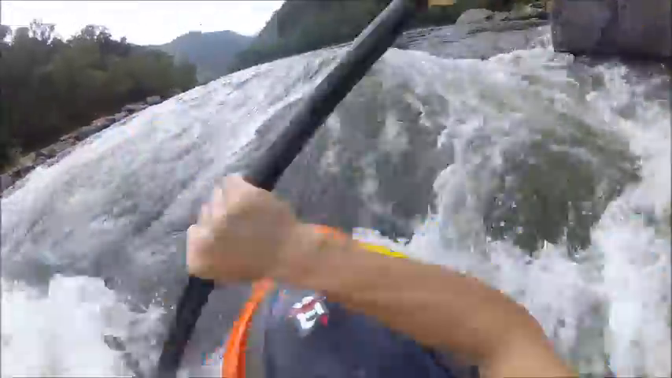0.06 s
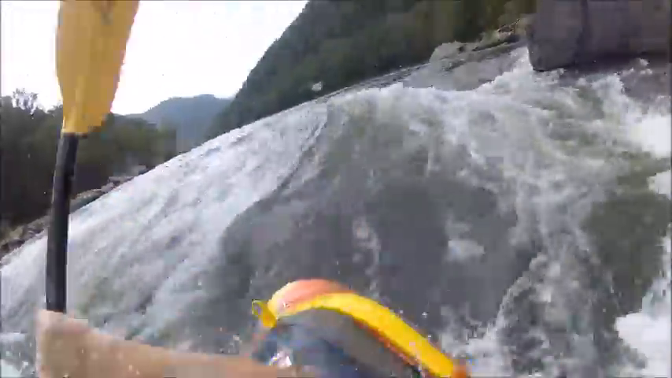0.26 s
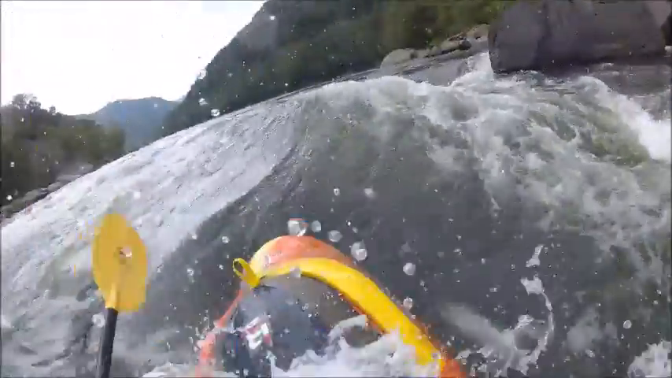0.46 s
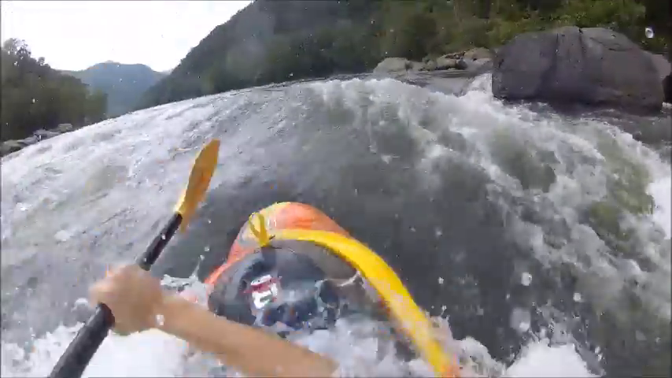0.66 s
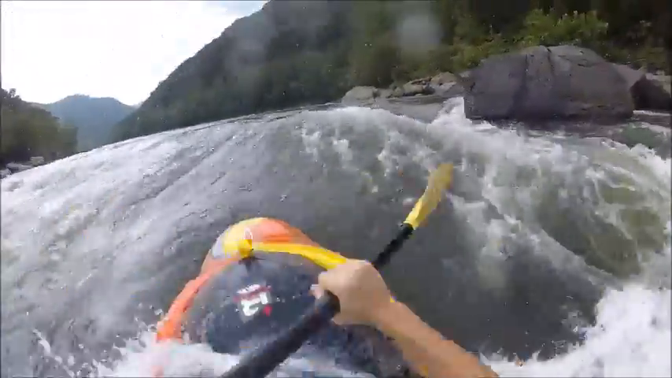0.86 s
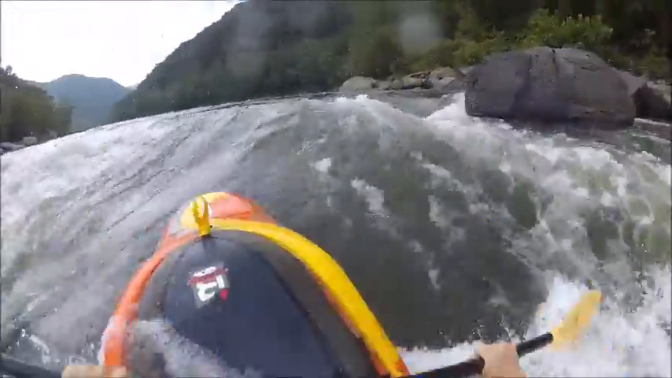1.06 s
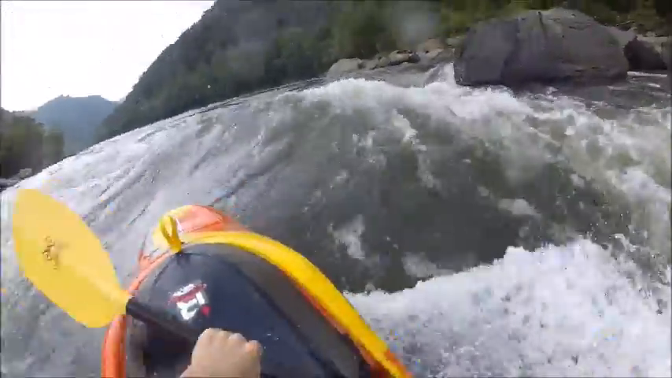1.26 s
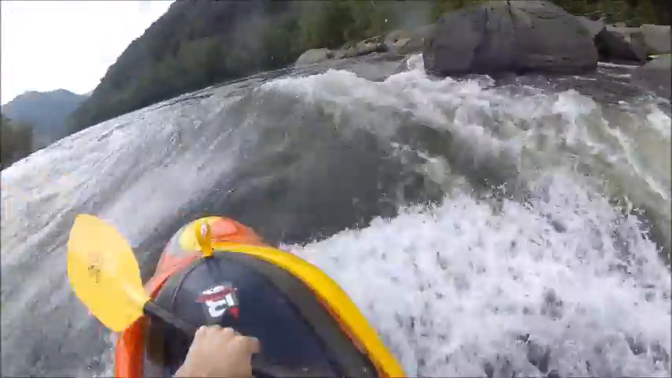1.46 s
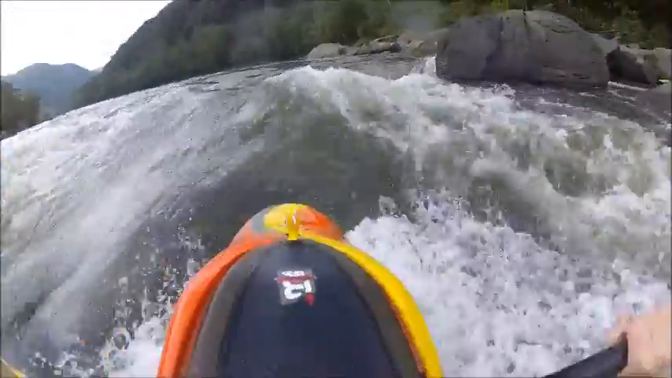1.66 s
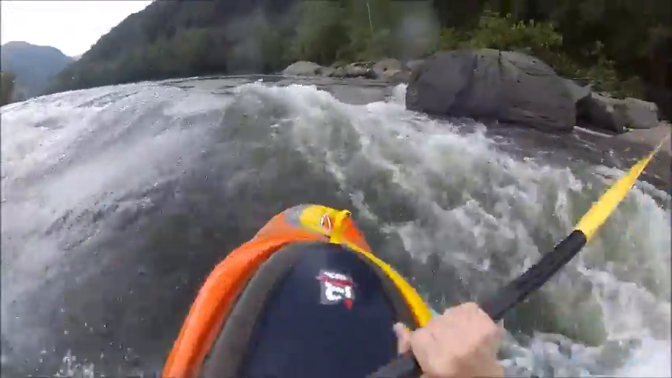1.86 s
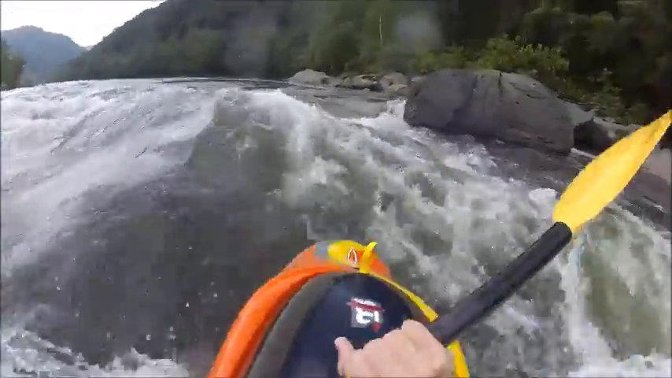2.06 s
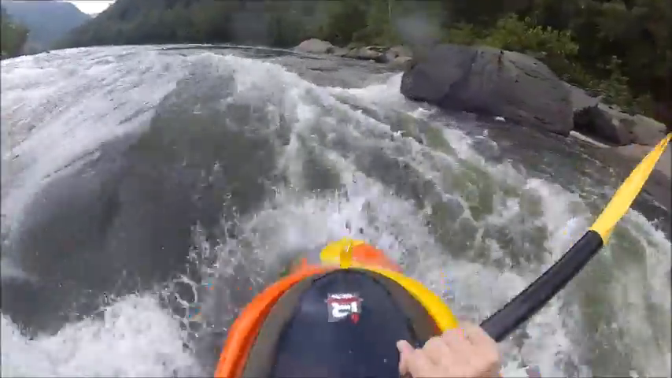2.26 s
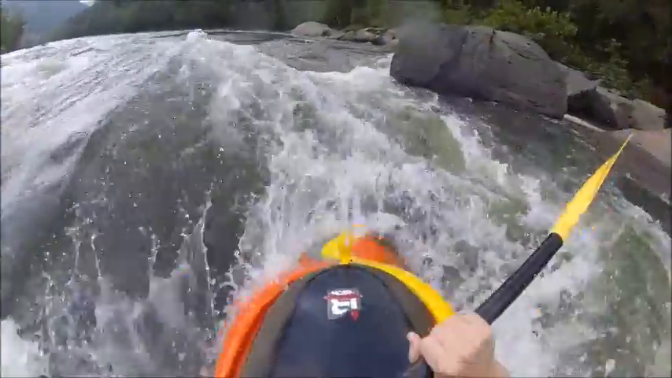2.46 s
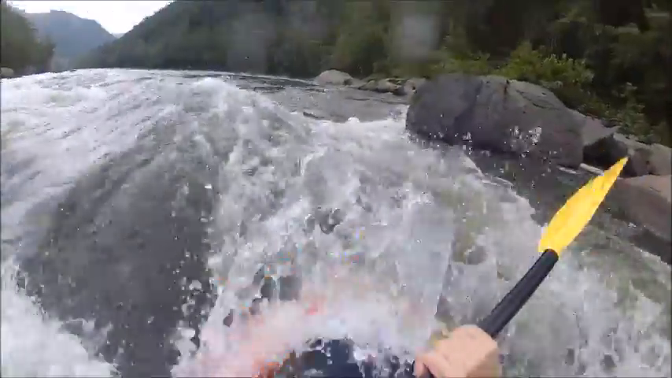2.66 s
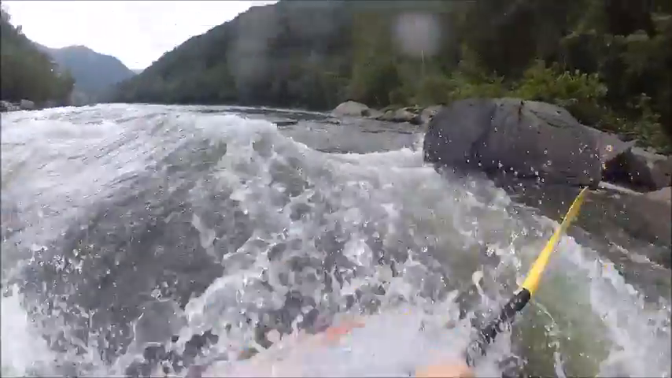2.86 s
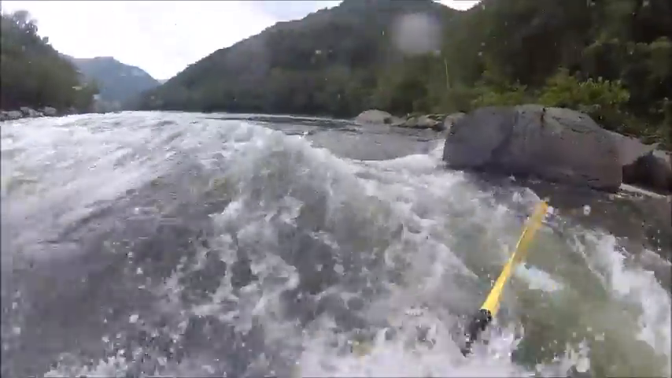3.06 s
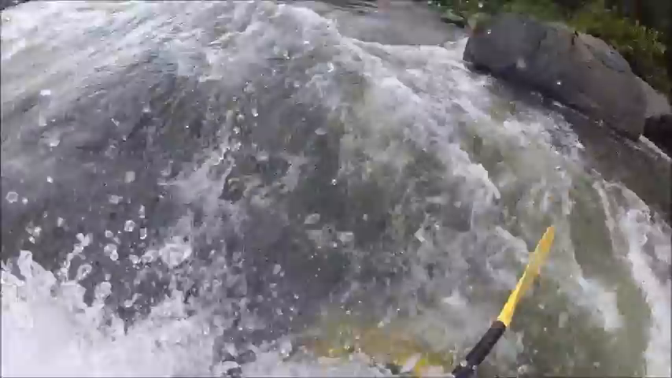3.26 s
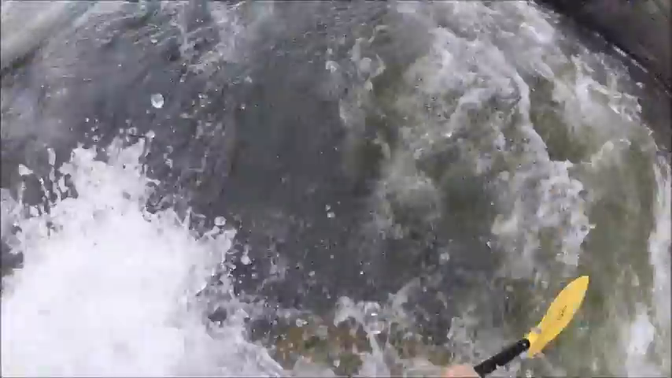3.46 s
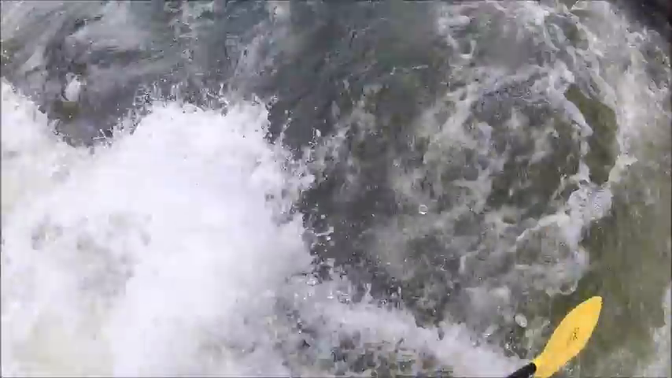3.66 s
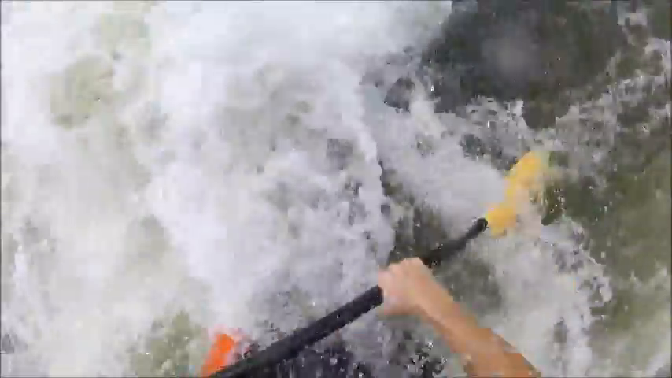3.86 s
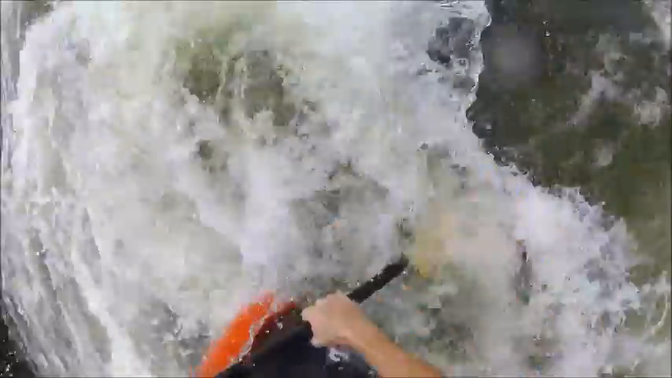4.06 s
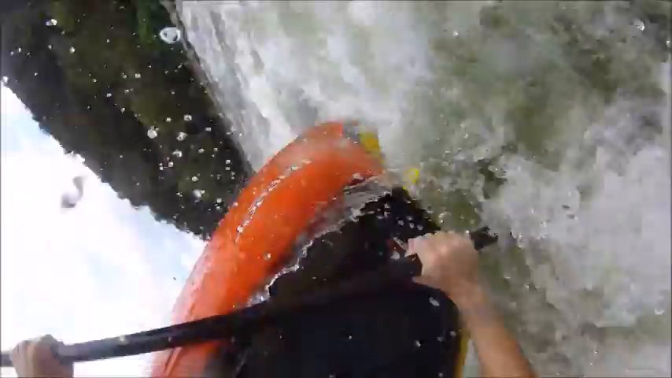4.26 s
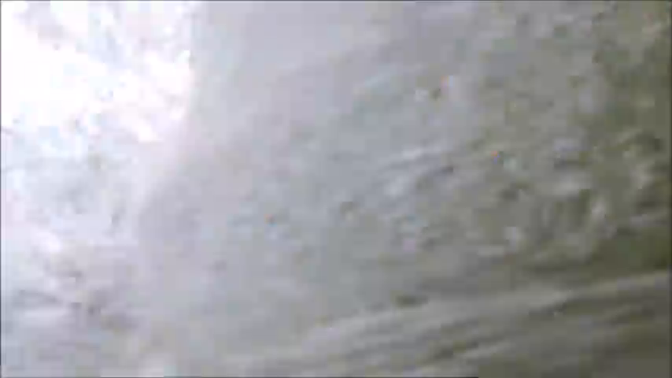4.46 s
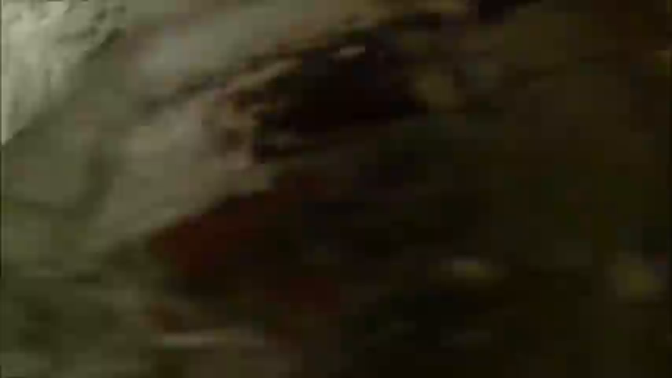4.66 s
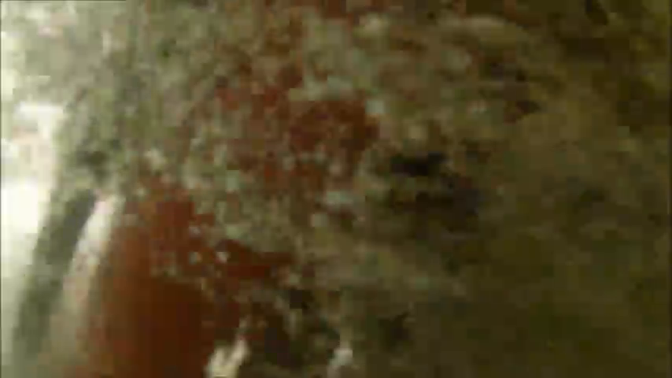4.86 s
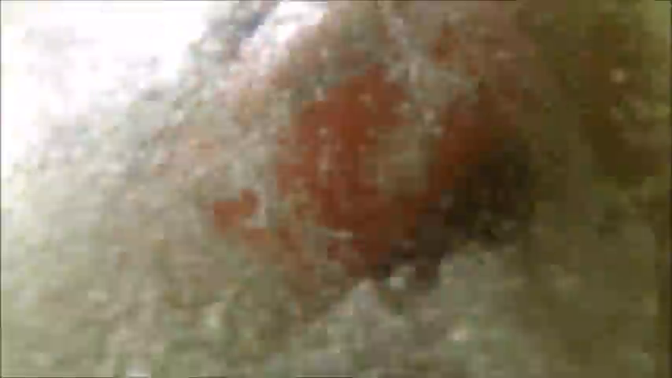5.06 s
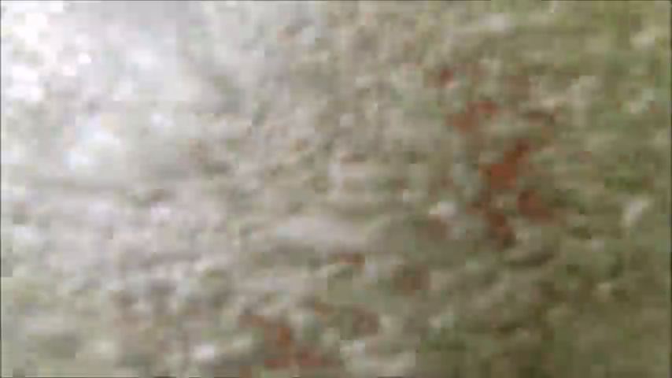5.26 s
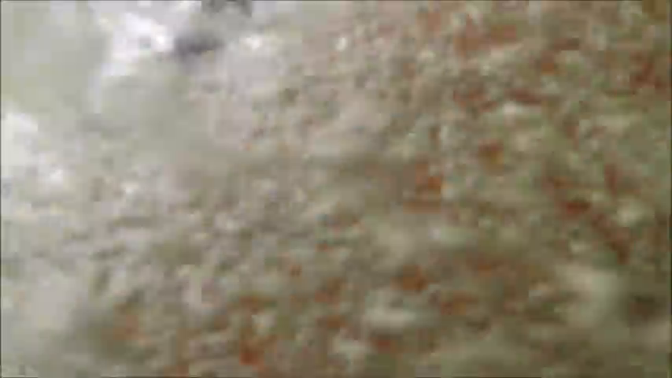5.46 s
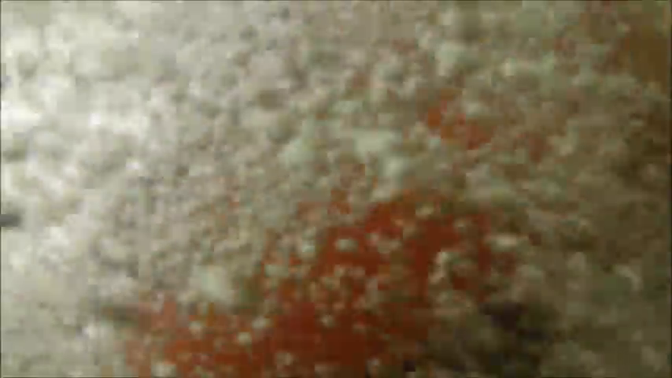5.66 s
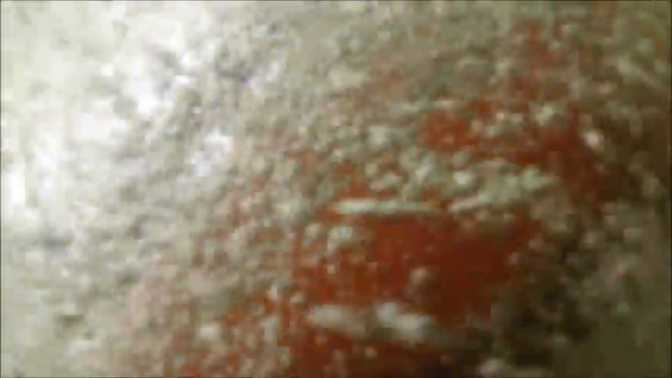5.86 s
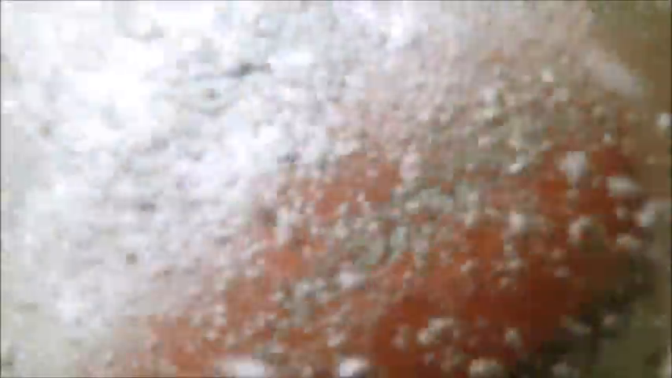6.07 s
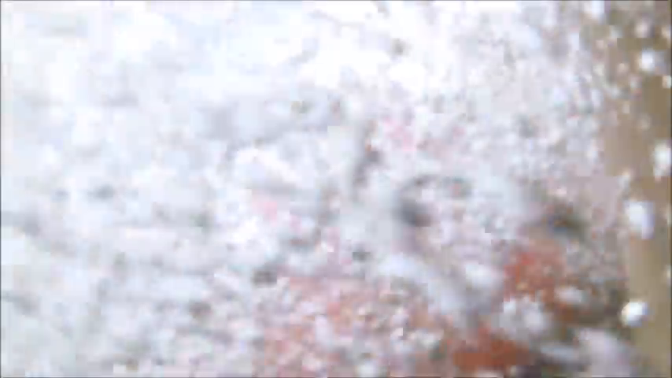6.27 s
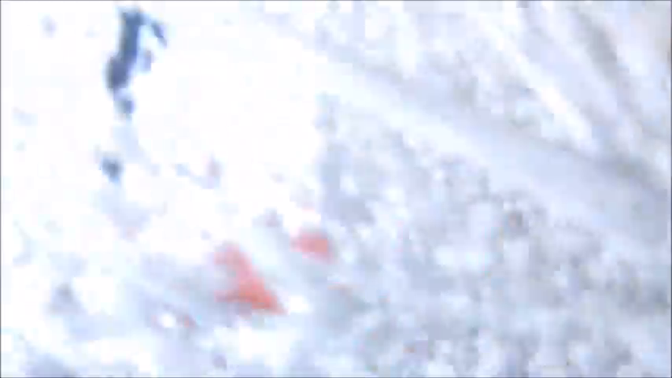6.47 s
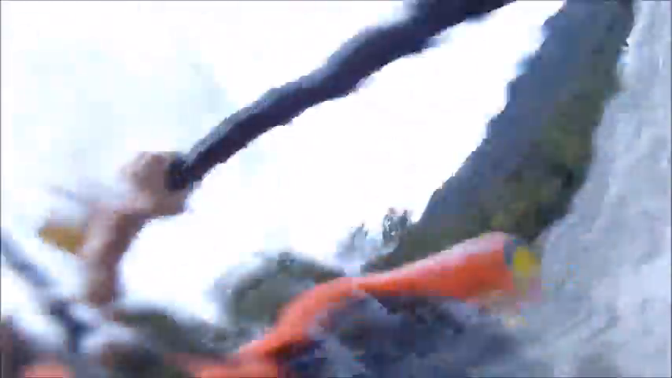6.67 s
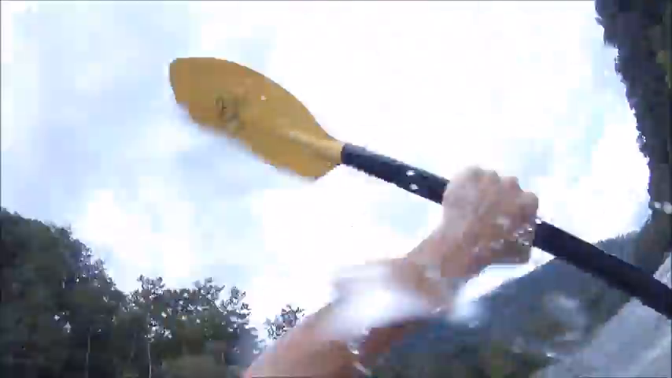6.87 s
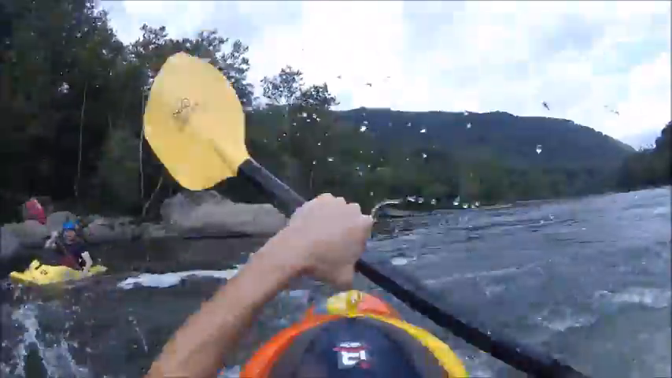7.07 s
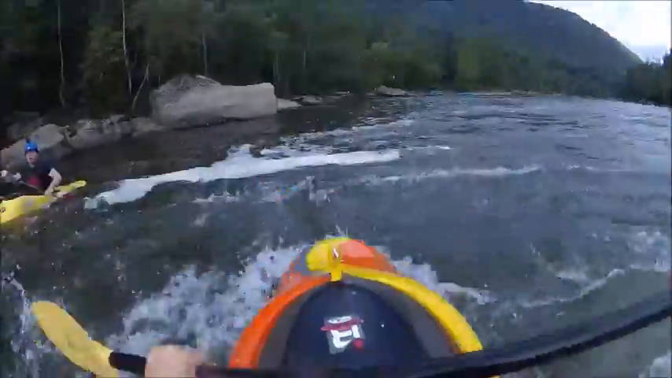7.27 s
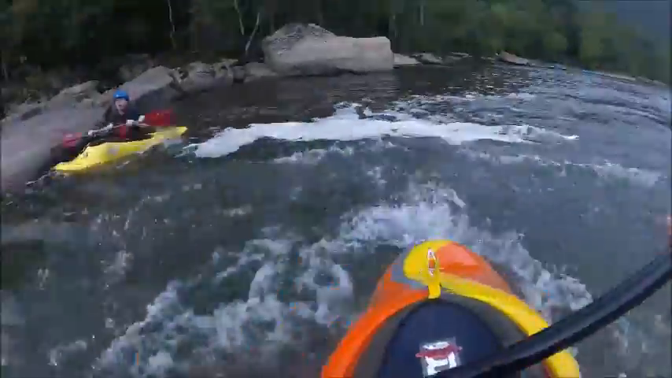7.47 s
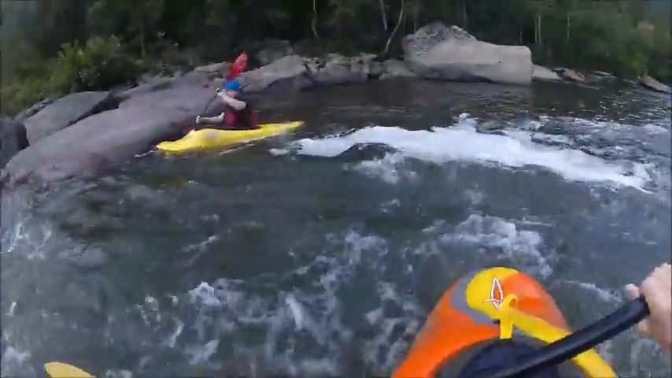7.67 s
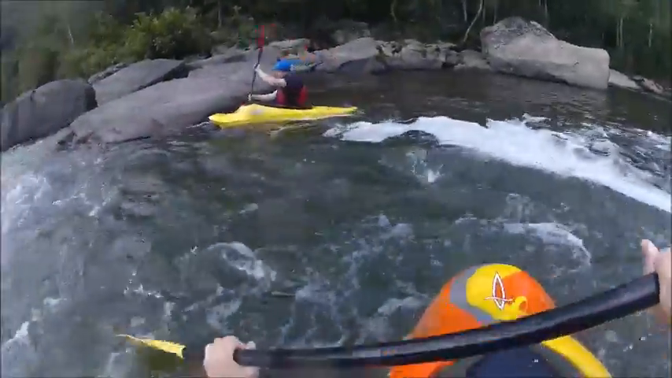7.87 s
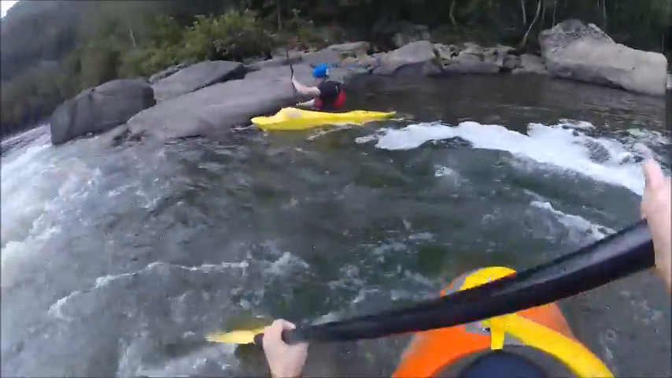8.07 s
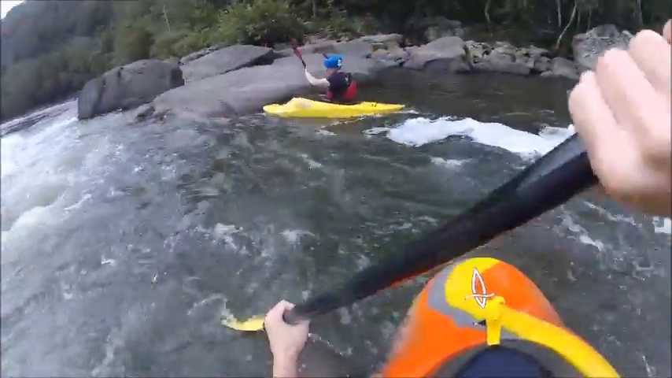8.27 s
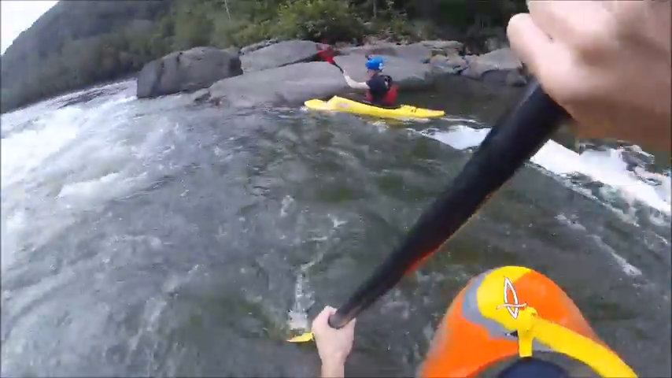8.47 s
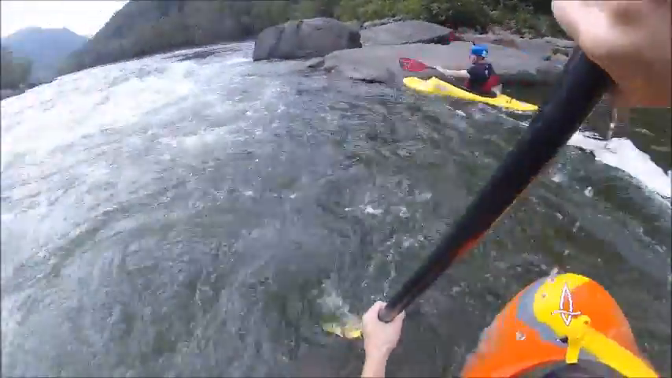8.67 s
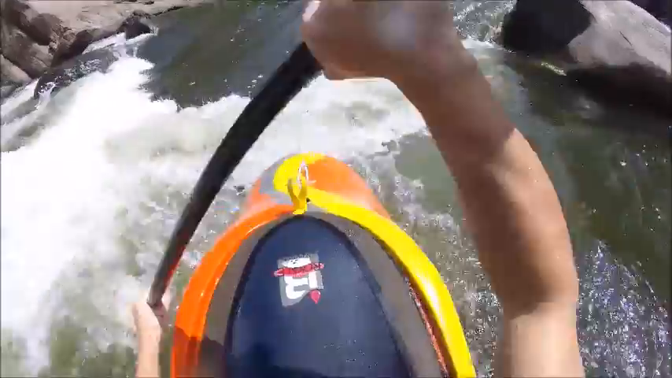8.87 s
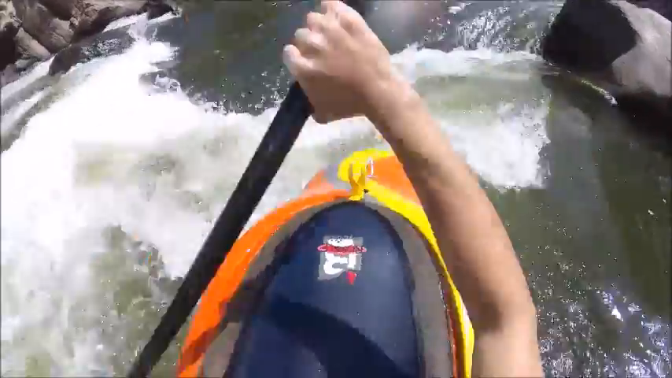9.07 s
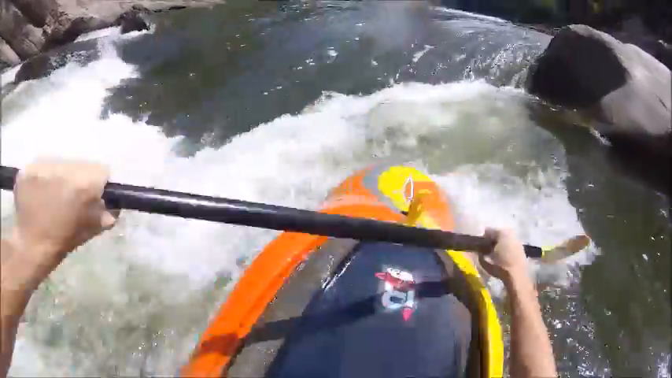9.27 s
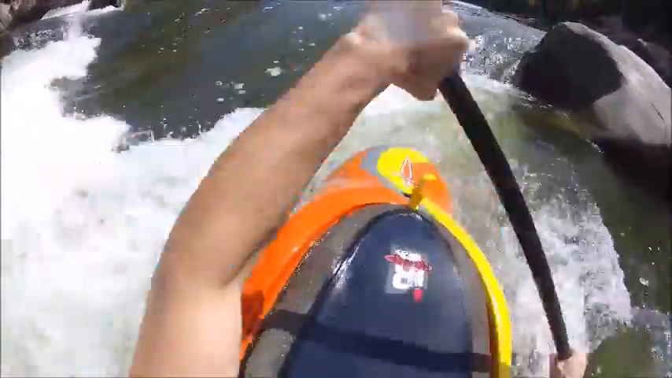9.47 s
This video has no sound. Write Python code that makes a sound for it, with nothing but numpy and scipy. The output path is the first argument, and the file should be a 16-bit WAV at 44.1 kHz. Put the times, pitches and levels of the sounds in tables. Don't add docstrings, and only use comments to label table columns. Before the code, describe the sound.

A kayak capsizes in a roaring rapid: foam hiss, sudden dunking, distorted stuttering clatter under water, near silence with clicking drips, then rushing water again.

```python
import sys
import numpy as np
from scipy import signal
from scipy.fft import rfft, irfft, next_fast_len
from scipy.io import wavfile
from scipy.ndimage import uniform_filter1d

SR = 44100
rng = np.random.default_rng(int(sys.argv[2]) if len(sys.argv) > 2 else 0)


def wav_out(sig):
    wavfile.write(sys.argv[1], SR, np.round(np.clip(np.atleast_2d(sig).T, -1, 1) * 32767).astype(np.int16))


def elevation(decibels):
    levels = np.asarray(decibels, float)
    return 10 ** (levels / 20)


N = 419391

# time [s], level [dB], brightness (share above 3 kHz) [dB].
ROAR = [(0.0, -21.5, -3.5), (0.18, -20.5, -4), (0.22, -21, -6.5), (1.51, -19.5, -4.5), (1.62, -21, -5),
        (2.03, -20, -6.5), (4.24, -20, -2), (4.36, -20, -3.5), (4.4, -16.5, -3.5)]
# time [s], level [dB], brightness [dB].
PLUNGE = [
    [(4.403, -18, -5.5), (4.408, -10, -6), (4.427, -16, -4.5)],
    [(4.429, -10, -2), (4.445, -11.5, -2)],
]
# time [s], level [dB], brightness [dB].
ROAR_RETURN = [
    [(7.352, -36.5, -9.5), (7.842, -35.5, -10), (8.289, -32.5, -9.5)],
    [(8.3, -34.5, -13.5), (8.676, -31, -10)],
    [(8.677, -38.5, -12), (8.822, -38.5, -11)],
    [(8.823, -23.5, -3.5), (9.405, -20, -4), (9.51, -21.5, -4)],
]
# frequency [Hz], density [dB per Hz].
FOAM_SPECTRUM = [(92, -34.5), (181, -18.5), (349, -9), (578, -2.5), (1090, 1), (2200, -2), (3500, -3.5),
                 (5200, -8), (5600, -11.5), (7000, -16.5), (8000, -28.5), (10200, -36.5), (10900, -41.5),
                 (12700, -42.5), (13500, -58.5)]
# start [s], end [s], treble change [dB].
PORT_WATER = [
    (4.428, 4.45, 11),
    (8.677, 8.822, -13),
]
# time [s], depth [dB].
TREBLE_DIPS = [(.17, -29), (.65, -20), (.72, -17), (1.345, -18), (2.113, -22), (2.156, -19), (2.65, -19),
               (3.25, -20), (3.74, -22), (9.41, -20)]
# time [s], rise [dB], length [s].
SURGES = [(0.17, 4, 0.012), (0.901, 5, 0.013), (1.35, 1, 0.047), (3.597, 3.5, 0.033), (3.972, 4, 0.047),
          (4.2, 4.5, 0.057), (2.696, 3.5, 0.057), (2.933, 3.5, 0.027)]
# start [s], length [ms], level [dB].
SLAMS_SINKING = [(4.4501, 22.7, -19), (4.4766, 5.6, -17), (4.4998, 8.6, -20), (4.52, 67.6, -16.5),
                 (4.586, 44.7, -11.5), (4.6349, 21, -19), (4.658, 11.7, -14), (4.677, 6.6, -18),
                 (4.7056, 3.1, -25.5), (4.7118, 8.1, -21), (4.7318, 28.7, -16.5), (4.769, 91.7, -13),
                 (4.8566, 59, -11.5), (4.9131, 31.7, -16), (4.9482, 39, -16.5), (4.9913, 2.6, -19),
                 (5.0079, 38.4, -18.5), (5.0492, 9, -18), (5.0669, 90, -14), (5.1661, 2.3, -22),
                 (5.1864, 68, -20), (5.2643, 86, -13.5), (5.3509, 3.6, -23), (5.371, 10.2, -27),
                 (5.3912, 30, -18.5), (5.4369, 23.4, -15.5), (5.4787, 12, -24), (5.5092, 1.8, -38),
                 (5.54, 5.2, -30.5)]
# start [s], length [ms], level [dB].
SLAMS_INVERTED = [(5.5624, 20.3, -16), (5.5885, 4.45, -22), (5.6, 35.8, -12), (5.6391, 3.04, -24.5),
                  (5.6619, 1.5, -35), (5.6898, 3, -29.5), (5.7157, 3, -31.5), (5.7499, 12.7, -20),
                  (5.7663, 24, -26.5), (5.7961, 14.7, -19), (5.816, 28, -12.5), (5.8479, 6.5, -21),
                  (5.8658, 18.7, -13.5), (5.8909, 45.7, -20.5), (5.9442, 40.6, -14.5), (6.003, 10.2, -20),
                  (6.022, 8.6, -26), (6.0445, 8, -14), (6.0608, 8.7, -23), (6.0803, 59, -18),
                  (6.1433, 9.4, -22), (6.159, 20.9, -14.5), (6.1859, 36.6, -24.5), (6.232, 4.1, -26),
                  (6.249, 24.3, -20.5), (6.2862, 17.4, -24.5), (6.3135, 11.4, -18), (6.3302, 3.9, -20.5),
                  (6.346, 9, -18.5), (6.3807, 5.5, -19.5)]
# start [s], length [ms], level [dB].
SLAMS_ROLLING = [(6.399, 14.6, -15), (6.4183, 20, -14), (6.442, 22, -16.5), (6.4678, 22, -14),
                 (6.4995, 12.7, -19.5), (6.5147, 2, -24), (6.5249, 45, -15), (6.5907, 9.9, -27),
                 (6.7938, .85, -40.5), (6.8358, 4.3, -22.5), (6.8853, 29.5, -12.5), (6.9158, 29, -15.5),
                 (6.949, 12, -21.5), (6.972, 8, -29), (6.9852, 7.2, -30.5), (7.0266, 2, -33),
                 (7.039, 7.4, -24.5), (7.051, 2, -37), (7.1356, 7, -17.5), (7.143, 5, -30)]
# start [s], length [ms], level [dB].
FLICKS = [(4.492, 2.4, -30), (4.6904, 5.5, -29), (4.7624, 3, -27), (5.1737, 1.4, -36), (5.3653, 1.2, -33),
          (5.425, 1.3, -26), (5.5242, .5, -42.5), (5.5526, 1.2, -44), (5.6795, 0.83, -44),
          (5.9997, 0.97, -34), (6.0384, 1, -29.5), (6.0725, 2.1, -35), (6.338, 0.98, -35),
          (6.3592, 1.1, -34), (6.3738, 2.05, -30), (6.494, 1.9, -34.5), (7.022, 2.6, -43)]
# time [s], swing rate [Hz], share of sound above 5 kHz [dB].
STRAIN = [(4.47, 480, -11.5), (4.62, 517, -11.5), (4.87, 549.6, -6.5), (5.03, 339.8, -14.5),
          (5.22, 295, -14), (5.45, 359, -14.5), (5.61, 418, -11.5), (5.76, 307.8, -16.5),
          (6.02, 319.3, -15), (6.045, 750, -8), (6.07, 353, -16.5), (6.24, 327, -18), (6.43, 397, -12),
          (6.8, 450, -22), (6.835, 330, -10), (6.9, 358, -17.5), (7.04, 520, -23), (7.13, 1050, -17.5)]
# start [s], level [dB].
PINNED = [(4.447, -42), (5.25, -95), (5.27, -48.5), (5.422, -86), (5.44, -32), (5.48, -58), (5.63, -93),
          (5.717, -50.5), (5.87, -38), (5.93, -46), (6.25, -42.5), (6.33, -57),
          (6.388, -97.5)  , (6.4, -38), (6.56, -63), (6.601, -76), (6.795, -66.5), (6.841, -52)]
# frequency [Hz], density [dB per Hz].
SEEP_SPECTRUM = [(60, -18.5), (217, -11), (417, -22), (750, -8), (1200, -11), (2500, -12), (5000, -21),
                 (9000, -47), (16000, -50)]
# frequency [Hz], density [dB per Hz].
POCKET_SPECTRUM = [(60, -25), (250, -16.5), (480, -6), (750, -4.5), (1000, -11), (1500, -20.5), (2700, -25),
                   (5000, -39.5), (7000, -52), (16000, -71)]
# start [s], length [ms], level [dB].
CLOGS = [(7.056, 12, -48), (7.104, 20, -71), (7.12, 17, -43), (7.211, 51, -74), (7.329, 21, -62),
         (8.289, 11, -52)]
# time [s], peak [dB], pitch [Hz], t60 [s], thump [dB].
DRIPS = [(7.351, -21, 910, 0.0021, -26), (7.8785, -16, 1900, 0.0047, -48), (7.8803, -19, 2400, .004, -50),
         (7.8893, -11, 2300, 0.0066, -40), (7.8968, -8, 1700, 0.0016, -39), (8.278, -34, 2500, 0.0025, -45),
         (8.287, -23, 2800, 0.0061, -23), (8.3325, -15, 2420, 0.003, -46), (8.3362, -13, 800, 0.0063, -43),
         (8.3362, -11, 2000, .002, -50), (8.3362, -17, 3400, 0.0021, -50), (8.347, -20, 980, 0.0041, -48),
         (8.4445, -16, 2920, .005, -45), (8.4447, -15, 1900, 0.0032, -50), (8.6547, -9, 2230, 0.0034, -44),
         (8.671, -4.5, 1660, 0.004, -45)]

SPELLS = [*SLAMS_SINKING, *SLAMS_INVERTED, *SLAMS_ROLLING, *FLICKS]

# inner edges, level at CLEAR_DB brightness, dB gained per dB of brightness
ZONES_HZ = (1200, 3000, 7500)
ZONE_DB, CLEAR_DB = (-5, -1, -2, -16.5), -5.5
ZONE_LEAN = (-0.61, -0.38, 1, 0.58)
LOW_CUT_HZ, VENT_HZ = 264, 800
PORT_HZ, PORT_WIDTH_HZ, CROSSING_S = 2950, 870, 0.00032
BURST_MS, WEAK_BURST_MS, WEAK_DB = 30, 9, -21.8
STALL_MS, FLICK_HZ_MS = 2.5, 450
SWELL_DB, SWELL_SHARE = -6, 0.15
RATE_SCATTER_DB, EDGE_SCATTER_DB, BURST_SCATTER_DB = 1.7, 2, 1.1
FREE_SEEP_DB, SURFACE_S = -34.5, 6.94
DRAIN_START_S, DRAIN_STOP_S, DRAIN_FADE_S = 6.9515, 7.351, 0.07
DRAIN_DB, DRAIN_END_DB = -15.5, -36.5
GLUG_HZ, GLUG_DB = 75, 5
TOP_HZ = 15750


def level(x, db):
    return x * elevation(db) / np.sqrt(np.mean(x ** 2) + 1e-18)


def walk(rate_hz):
    hold = int(SR / rate_hz)
    steps = np.repeat(rng.standard_normal(N // hold + 1), hold)
    return 1.07 * uniform_filter1d(uniform_filter1d(steps, hold), hold)[:N]


def colour(x, shape, lo_hz=0., hi_hz=SR):
    size = next_fast_len(N)
    hz = np.arange(size // 2 + 1) * SR / size + 0.0011
    shape_hz, shape_db = np.transpose(shape)
    gain = elevation(np.interp(np.log(hz), np.log(shape_hz), shape_db))
    band = (hz >= lo_hz) * (hz < hi_hz)
    return irfft(rfft(x, size) * gain * band, size)[:N]


def cut(x, hz, kind, order=2):
    return signal.sosfilt(signal.butter(order, hz, kind, fs=SR, output="sos"), x)


def roar_curves_db():
    t = np.arange(N) / SR
    curves = np.full((4, N), -120.)
    for rows in [ROAR + PLUNGE[0], PLUNGE[1], *ROAR_RETURN]:
        s, roar_db, bright_db = np.transpose(rows)
        span = (t >= s[0]) & (t <= s[-1] + 0.001)
        for zone, (db, lean) in enumerate(zip(ZONE_DB, ZONE_LEAN)):
            curves[zone, span] = np.interp(t[span], s, roar_db + db + lean * (bright_db - CLEAR_DB))
    for start, end, db in PORT_WATER:
        curves[3] += db * ((t > start) & (t < end))
    for s, db in TREBLE_DIPS:
        curves[3] += db * np.exp(-((t - s) / 0.0065) ** 2)
    zone_share = np.array([[0.4], [0.8], [1], [1]])
    for s, db, length in SURGES:
        curves += zone_share * db * np.exp(-((t - s) / length) ** 2)
    return curves


def foam():
    curves = roar_curves_db()
    out = level(rng.standard_normal(N), -55.5) * (curves[0] > -100)
    pops = (rng.random(N) < 3000 / SR) * rng.standard_normal(N) * elevation(1.6 * rng.exponential(size=N))
    wash = rng.standard_normal(N) + level(pops, -5.5)
    edges = (50, *ZONES_HZ, SR / 2)
    zones = []
    for steps in np.geomspace(edges[:-1], edges[1:], 5).T:
        zones.append([colour(wash, FOAM_SPECTRUM, a, b) for a, b in zip(steps, steps[1:])])
    zone_rms = np.array([[np.std(sum(zone))] for zone in zones])
    gains = uniform_filter1d(elevation(curves + 0.57 * walk(6)), size=24) / zone_rms
    for k, band in enumerate(sum(zones, [])):
        place = np.clip((k - 1.5) / 4, 0, 2.999)
        near, share = int(place), place % 1
        gain = gains[near] ** (1 - share) * gains[near + 1] ** share
        out = out + band * elevation(0.95 * walk(18)) * gain
    return out


def slam(ms, hz, db, edge_db, chance):
    size = int(ms * SR / 1000)
    halves = 2 * max(round(ms * hz / 1000), 1)
    ends = np.cumsum(elevation(900 / hz * chance[:halves]))
    ends = (ends - 0.5 * ends[0]) * size / (ends[-1] - 0.5 * ends[0])
    which = np.searchsorted(ends, np.arange(size)).clip(0, halves - 1)

    sluggish = elevation(0.23 * max(-6 - edge_db, 0))
    crossing = CROSSING_S * SR * sluggish * elevation(2.0 * chance[halves:2 * halves])
    crossing = np.minimum(crossing, 0.8 * np.diff(np.r_[-size, ends]))
    progress = 1.5 - (ends[which] - np.arange(size)) / crossing[which]
    rattle = 0.16 * elevation(edge_db + 4.5) * np.resize(chance, size) * (progress > 0)
    recoil = -0.4 * progress.clip(0)
    speed = np.where(progress > 0.5, progress - 0.5, recoil) + rattle

    reach = elevation(15.5 * chance[::-1][which]).clip(0, 1.3)
    age = np.arange(size) / size
    reach *= elevation(-5.0 * age + SWELL_DB * (1 - age / SWELL_SHARE).clip(0))
    swings = np.r_[(-1.) ** which * reach * speed, np.zeros(400)]
    stiff = cut(swings, VENT_HZ, "high", order=1)
    spikes = cut(stiff, LOW_CUT_HZ, "high", order=1)
    ring = signal.lfilter(*signal.iirpeak(PORT_HZ, PORT_HZ / PORT_WIDTH_HZ, fs=SR), spikes)

    cushion_hz = np.clip(15000 * elevation(1.03 * (edge_db + 4.5)), 900, 19000)
    soft = cut(spikes + 0.19 * ring, cushion_hz, "low")
    glint = np.r_[elevation(edge_db + 4 + 5.0 * chance[which + 90]).clip(0, 1), np.zeros(400)]
    edge = cut(cut(spikes, cushion_hz, "high", order=1), 9800.0, "low", order=1)
    hard = uniform_filter1d(glint, size=24, origin=11) * edge
    return level(soft + hard, db) * np.sqrt(len(spikes) / size)


def slamming():
    out = np.zeros(N)
    when, swing_hz, edge_db = np.transpose(STRAIN)
    for (s, ms, db), rows in zip(SPELLS, rng.standard_normal((len(SPELLS), 6, 200))):
        burst_ms = BURST_MS if db > WEAK_DB else WEAK_BURST_MS
        count = min(int(np.ceil(ms / burst_ms)), 6)
        for k, row in enumerate(rows[:count]):
            start_s = s + k * ms / count / 1000
            length_ms = ms / count - STALL_MS * (k < count - 1)
            hz = np.interp(start_s, when, swing_hz) * elevation(RATE_SCATTER_DB * row[80])
            hz += FLICK_HZ_MS / length_ms
            burst_db = db + BURST_SCATTER_DB * row[81] * (count > 1)
            burst_edge_db = np.interp(start_s, when, edge_db) + EDGE_SCATTER_DB * row[82]
            burst = slam(length_ms, hz, burst_db, burst_edge_db, row)
            at = int(start_s * SR)
            out[at:at + len(burst)] += burst
    return out


def seep_db(t):
    free = np.zeros(N, bool)
    for s, ms, _ in SPELLS:
        free[int(s * SR):int((s + ms / 1000) * SR)] = True
    marks = np.array([(0, -120), *PINNED])
    pinned_db = marks[np.searchsorted(marks[:, 0], t, "right") - 1, 1]
    db = np.where(free, FREE_SEEP_DB, pinned_db)
    since = t - DRAIN_START_S
    full = np.exp(-since.clip(0) / DRAIN_FADE_S)
    glug_db = GLUG_DB * np.cos(2 * np.pi * GLUG_HZ * since)
    draining = DRAIN_END_DB + (DRAIN_DB - DRAIN_END_DB + glug_db) * full
    db = np.where(t < DRAIN_START_S, db, np.where(t < DRAIN_STOP_S, draining, -120))
    for s, ms, clog_db in CLOGS:
        db[(t >= s) & (t < s + ms / 1000)] = clog_db
    return db


def gurgle():
    t = np.arange(N) / SR
    below = level(colour(rng.standard_normal(N), SEEP_SPECTRUM), 0) * elevation(5.6 * walk(120))
    above = level(colour(rng.standard_normal(N), POCKET_SPECTRUM), 0) * elevation(1.3 * walk(54))
    return np.where(t < SURFACE_S, below, above) * elevation(uniform_filter1d(seep_db(t), size=90))


def drips():
    out, t = np.zeros(N), np.arange(2000) / SR
    for s, db, hz, t60, thump_db in DRIPS:
        decay = np.exp(-np.log(1000) * t / t60)
        ring = np.sin(2 * np.pi * hz * t) * decay * (1 - np.exp(-t / 0.00062))
        thump = np.sin(2 * np.pi * 160 * t) * np.exp(-t / 0.0027)
        at = int(s * SR)
        out[at:at + len(t)] += elevation(db) * ring / ring.max() + elevation(thump_db) * thump
    return out


def preamp_hiss():
    return level(colour(rng.standard_normal(N), SEEP_SPECTRUM), -79)


def scene():
    return (foam() + slamming() + gurgle() + drips() + preamp_hiss())[None]


def band_limit(x):
    return signal.sosfilt(signal.butter(12, 16850, fs=SR, output="sos"), x)


def record(dry):
    rounded = np.tanh(0.82 * dry) / 1.117
    rumble_free = cut(rounded, 77.0, "high")
    top = signal.ellip(7, 0.3, 26, TOP_HZ, fs=SR, output="sos")
    return band_limit(signal.sosfilt(top, rumble_free))


dry = scene()
out = record(dry)
wav_out(out)
```